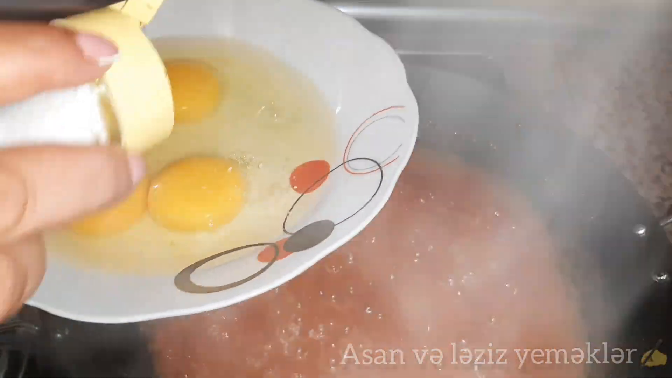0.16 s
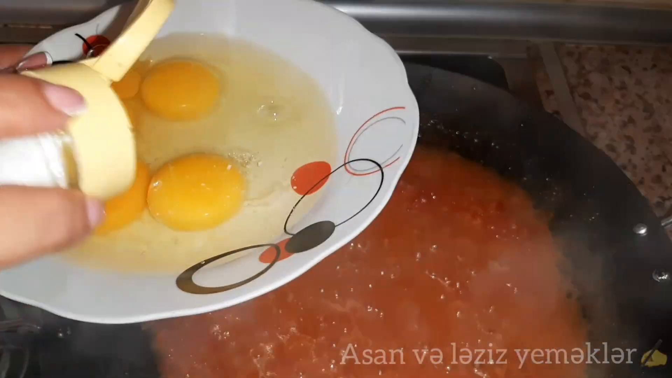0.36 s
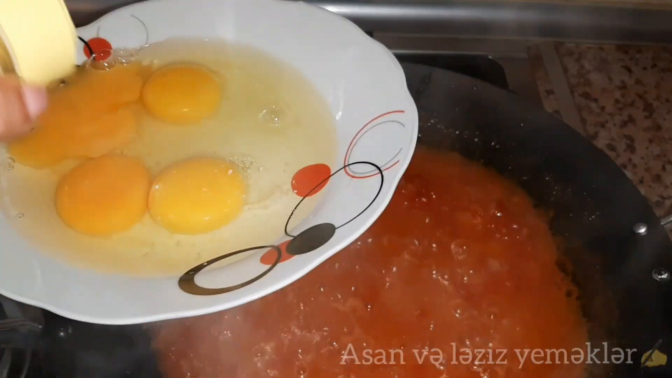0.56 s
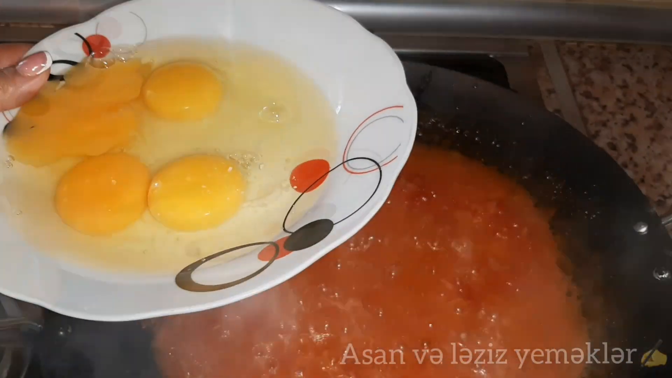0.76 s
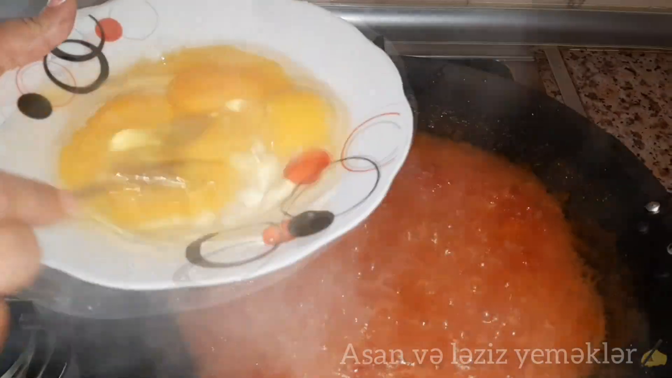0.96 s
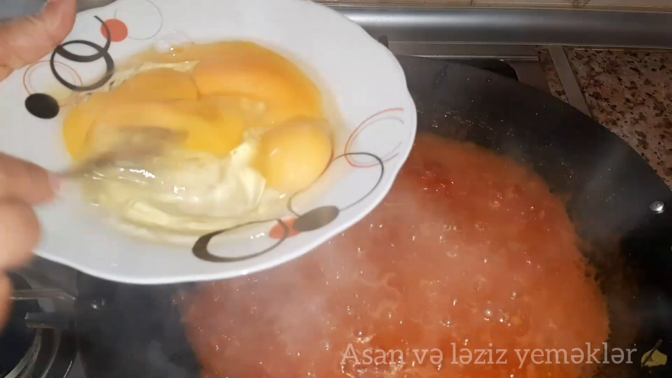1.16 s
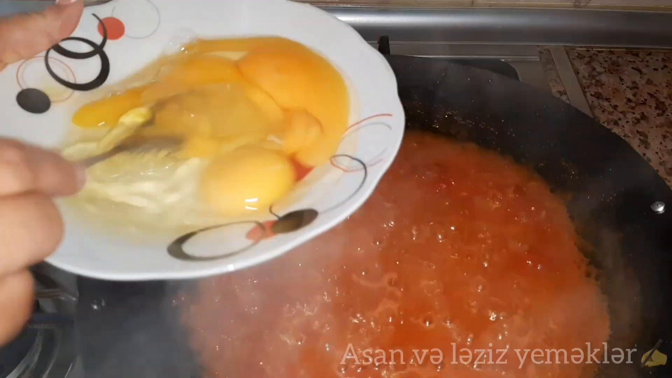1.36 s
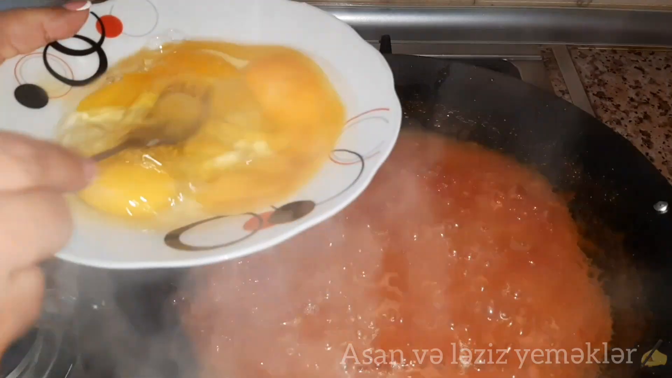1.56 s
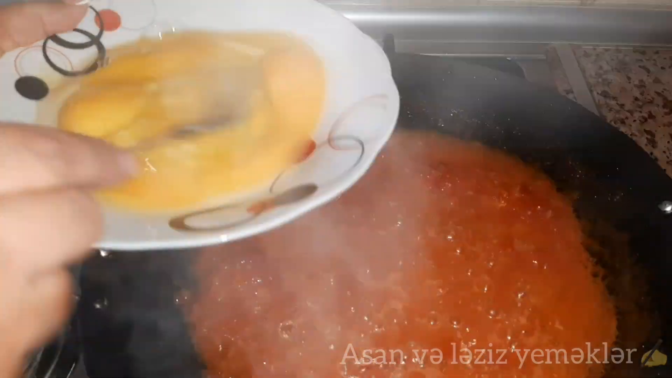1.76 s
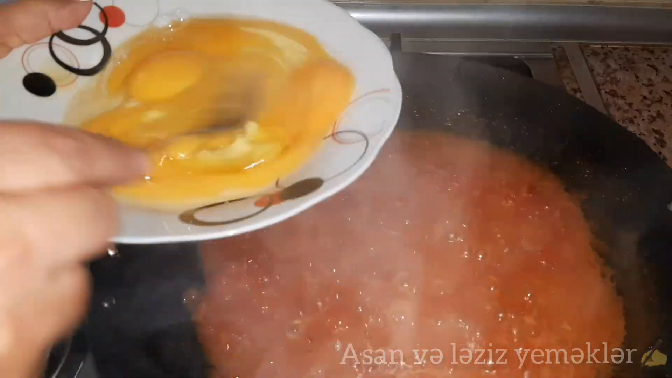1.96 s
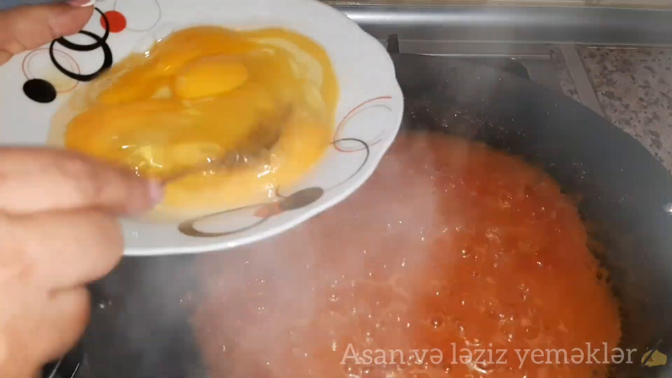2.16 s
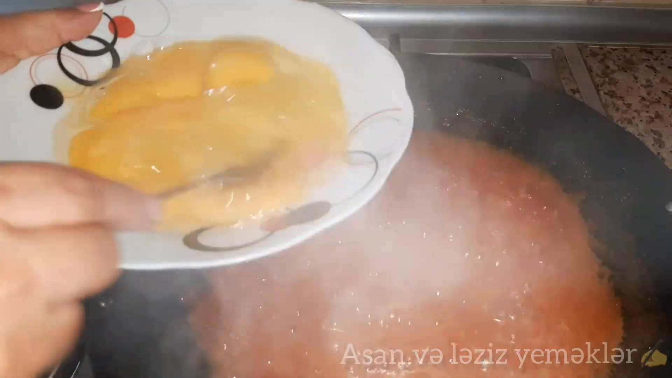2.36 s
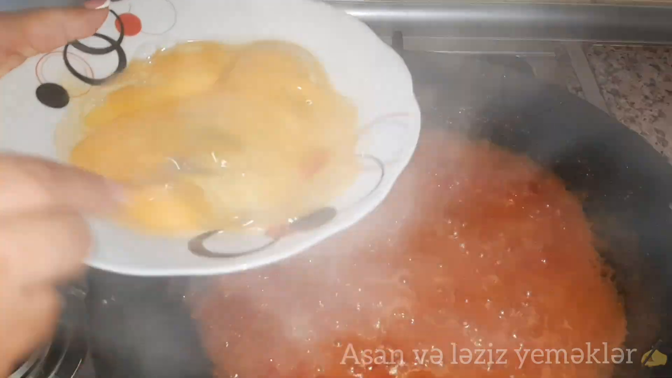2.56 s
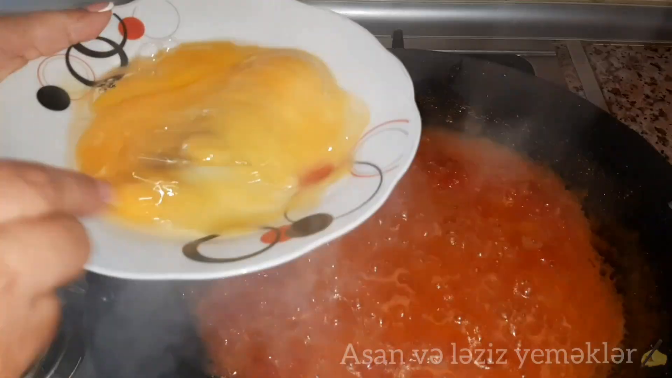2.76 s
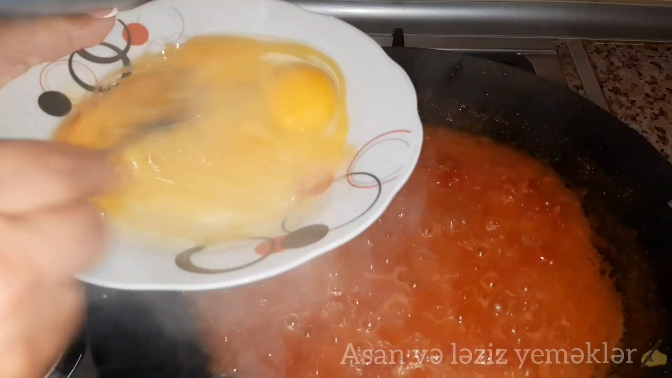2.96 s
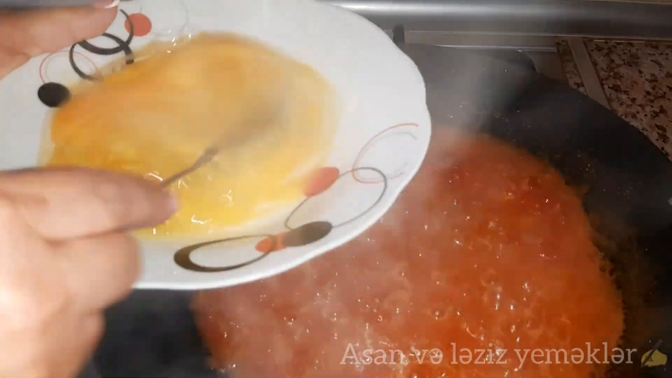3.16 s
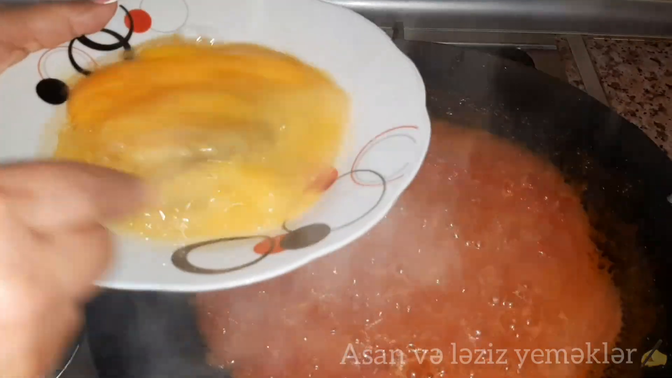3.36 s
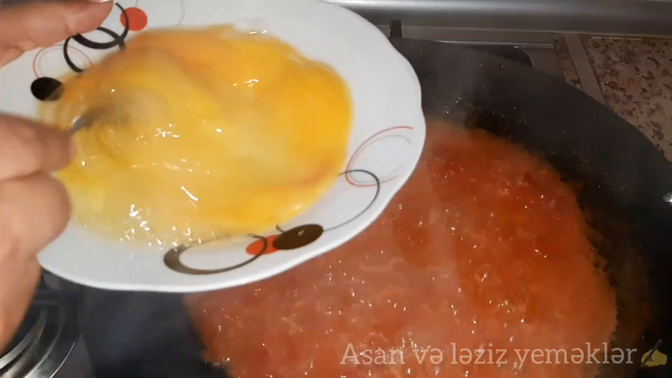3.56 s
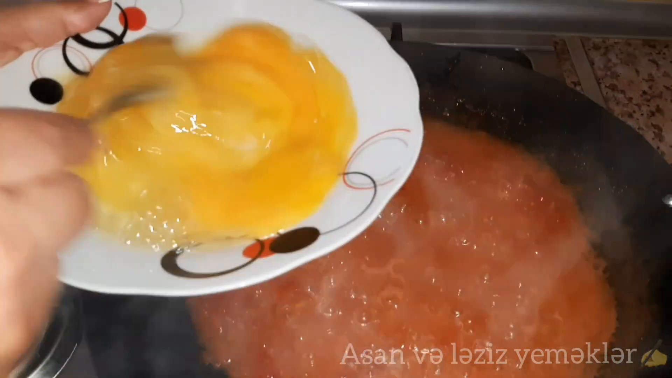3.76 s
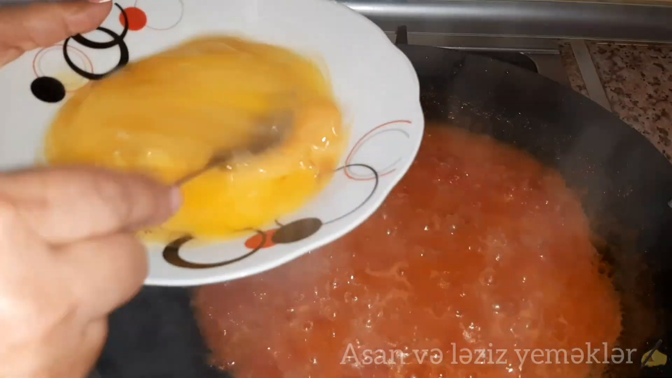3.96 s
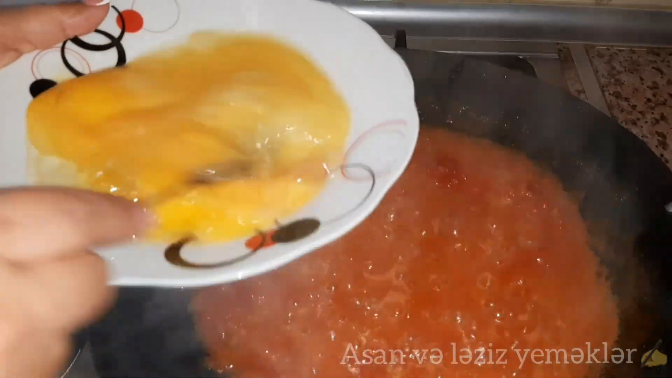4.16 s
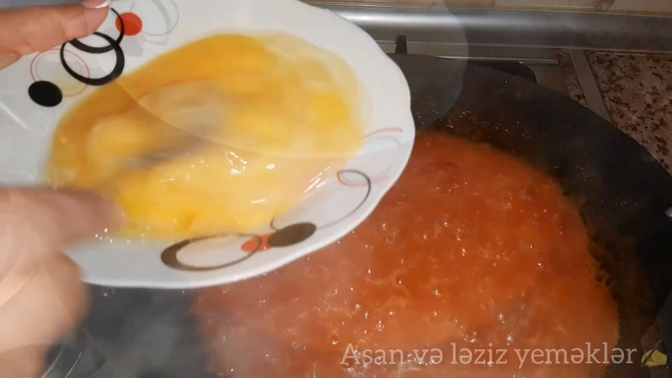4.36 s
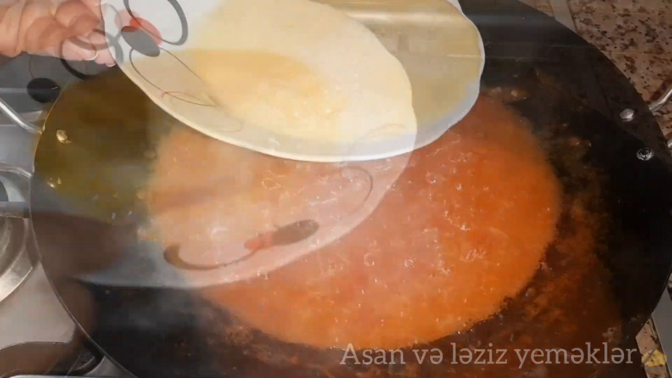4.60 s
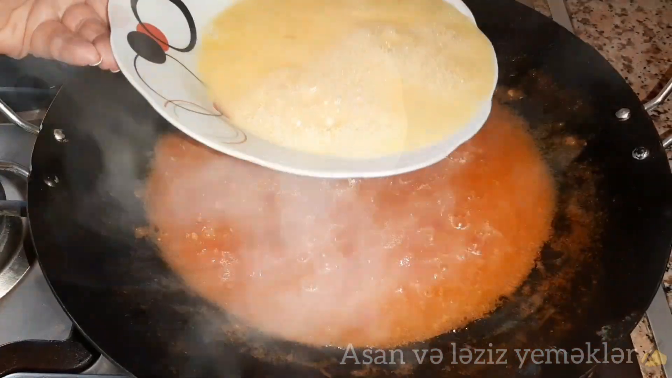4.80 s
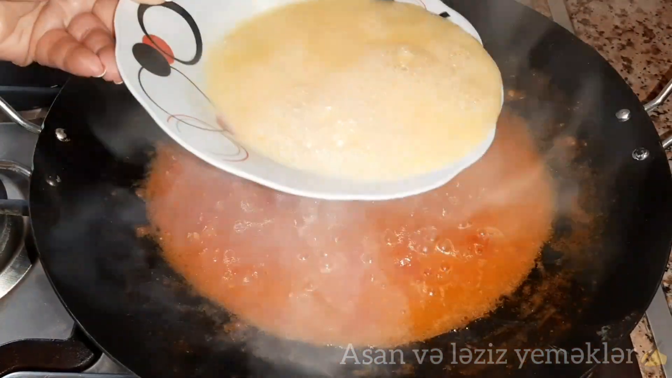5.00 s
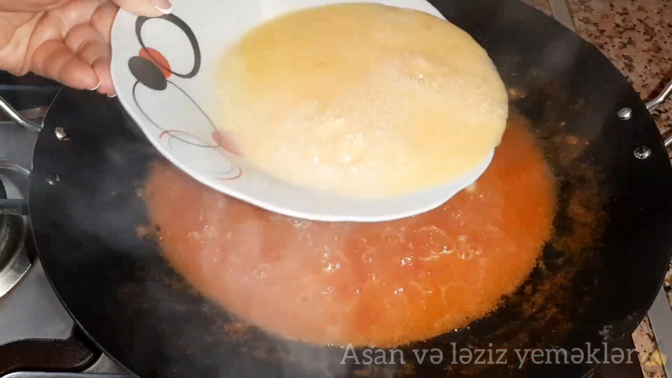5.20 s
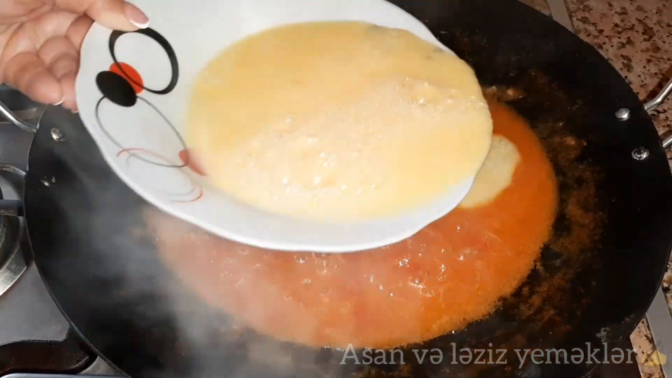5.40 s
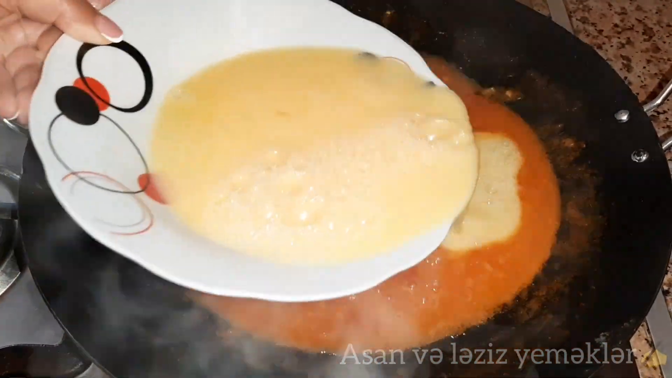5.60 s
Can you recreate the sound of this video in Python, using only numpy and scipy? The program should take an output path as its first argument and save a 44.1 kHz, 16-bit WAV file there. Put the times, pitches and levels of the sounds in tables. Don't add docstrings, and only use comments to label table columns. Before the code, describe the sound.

Close stereo kitchen sound: silence first, then steady, fast egg beating with a metal fork against a china plate, left of centre. Strokes are short, crisp and dry, strongest midway, with small scrapes, ticks and low handling bumps on the left. A quiet bubbling fizz lies underneath. The strokes weaken and vanish before five seconds, leaving nearer, louder simmering sauce and two almost joined crackling fat spits.

```python
import sys
import numpy as np
from scipy import signal
from scipy.io import wavfile
from scipy.ndimage import uniform_filter1d

SR = 44100
rng = np.random.default_rng(int(sys.argv[2]) if len(sys.argv) > 2 else 0)


def log_audio(samples):
    frames = np.atleast_2d(samples).T
    limited = np.clip(frames, -1, 1)
    pcm = np.round(limited * 32767).astype(np.int16)
    wavfile.write(sys.argv[1], SR, pcm)


def voltage_ratio(decibels):
    exponent = np.asarray(decibels, float) / 20
    return 10 ** exponent


N = 248724
LAG = 21

# mode_hz, level_db, t60_s
LOW_MODES = [(919, -1.5, 0.043), (1042, -2.5, 0.036), (1126, -3, 0.068), (1350, -6, 0.023),
             (1377, 3, 0.021)]
MIDDLE_MODES = [(2040, -11.5, 0.074), (2131, 1.5, 0.04), (2200, -1.5, 0.053), (2260, -7, 0.056),
                (2290, -4.5, 0.051)]
BRIGHT_MODES = [(5290, -5.5, 0.015), (5570, -9, 0.068), (5670, 8, 0.0085), (6018, 3, 0.026),
                (6074, -1.5, 0.031), (6390, 5.5, 0.016), (6590, 2, 0.016), (6930, 4.5, 0.027),
                (7230, 5.5, 0.014), (8120, -15, 0.044)]


def evened(x):
    return x / np.sqrt(np.mean(x ** 2) + 1e-20)


def peaked(x):
    return x / np.max(abs(x))


def read(points, hz):
    f, value = np.transpose(points)
    return np.interp(np.log(hz + 1), np.log(f + 1), value)


def add(mix, s, sound):
    part = mix[:, round(s * SR):][:, :sound.shape[1]]
    part += sound[:, :part.shape[1]]


def ports(sound, pan_db):
    left, right = sound * voltage_ratio([[pan_db / 2], [-pan_db / 2]])
    return np.array([left, np.r_[np.zeros(LAG), right[:-LAG]]])


def kitchen(x):
    # band_hz, t60_s
    room_decay = [(300, 0.43), (1000, 0.26), (2500, 0.39), (6000, 0.26), (12000, 0.26)]
    taps = np.zeros((2, SR // 2))
    at = np.arange(200, SR // 2 - 20, 20)
    at = at + rng.integers(0, 20, (2, len(at)))
    np.put_along_axis(taps, at, rng.choice([-1., 1.], at.shape), 1)
    hz, t, z = signal.stft(taps, SR, nperseg=256)
    decay = voltage_ratio(-60 * t / read(room_decay, hz)[:, None])
    tail = signal.istft(z * decay, SR, nperseg=256)[1]
    return signal.fftconvolve(x, tail / np.linalg.norm(tail[0]), axes=1)[:, :N]


def sauce():
    # time_s, level_db, close_share (0-1)
    simmer = [(.6, -59, 0.72), (1.4, -60.5, 0.94), (2.2, -63, 1), (3.0, -60, 0.4), (3.7, -64.5, 0.86),
              (4.2, -62, 0.8), (4.6, -56.5, 1), (5.0, -52.5, 1.2), (5.3, -50, 1.1), (5.64, -52.5, 1.2)]
    # band_hz, density_db (per Hz)
    far_colour = [(15, -60), (25, -30), (90, -7), (280, -10), (531, 5), (659, -14), (1130, 4.5), (1740, 1),
                  (2160, 13.5), (3250, -48), (6050, 10), (8360, -13), (11600, -13), (16000, -5)]
    close_colour = [(15, -54), (25, -43), (87, 1), (270, -16.5), (531, -3.5), (641, -9.5), (1040, -6.5),
                    (1840, -10.5), (2160, -8), (4870, -7.5), (6560, -10), (7710, -11), (12500, -15.5),
                    (16000, -23)]
    # band_hz, likeness (-1 to 1)
    likeness = [(60, 0.93), (180, 0.87), (550, 0.83), (1650, 0.2), (4970, 0.012), (15000, 0.025)]
    # band_hz, left_right_db
    balance = [(60, -1.5), (180, 4), (550, -0.5), (1650, -1.5), (4970, 0.5), (15000, 4)]

    frames, hz = N // 256 + 5, np.fft.rfftfreq(1024, 1 / SR)
    t = np.arange(frames) * 256 / SR
    s, db, share = np.transpose(simmer)
    close = np.clip(np.interp(t, s, share), 0, 1)

    hiss = rng.standard_normal((2, N + 2048))
    sizes = voltage_ratio(5.5 * np.minimum(rng.exponential(1, hiss.shape), 5))
    sizes = sizes * (rng.random(hiss.shape) < 1500 / SR)
    burst = rng.standard_normal((2, 300)) * np.exp(-np.arange(300) / (0.003 * SR))
    impulses = sizes * rng.choice([-1., 1.], sizes.shape)
    pops = evened(signal.oaconvolve(impulses, burst, "same", axes=1))

    z = signal.stft(hiss, nperseg=1024, noverlap=768)[2][:, :, :frames]
    z_pops = signal.stft(pops, nperseg=1024, noverlap=768)[2][:, :, :frames]
    z = z + .5 * np.outer(np.clip(hz / 4000, 0, 1.8), close ** 2) * z_pops
    same = np.clip(read(likeness, hz), -1, 1)[:, None]
    z = np.array([z[0], same * z[0] + np.sqrt(1 - same ** 2) * z[1]])

    patches = rng.standard_normal((frames, 513)).T
    patches = uniform_filter1d(patches, size=14, axis=0)
    patches = evened(uniform_filter1d(patches, size=10, axis=1))
    shapes = [voltage_ratio(read(c, hz)) for c in (far_colour, close_colour)]
    far, near = (c[:, None] / np.linalg.norm(c[5:]) for c in shapes)
    colour = np.sqrt((1 - close) * far ** 2 + close * near ** 2)
    colour = colour * voltage_ratio(1.72 * patches + np.interp(t, s, db))
    z = z * colour * voltage_ratio(np.outer([.5, -.5], read(balance, hz)))[:, :, None]
    return voltage_ratio(27.5) * signal.istft(z, nperseg=1024, noverlap=768)[1][:, :N]


def click(db, hz, width_hz, size=1200):
    t = np.arange(size) / SR
    swell = (1 - np.exp(-t * hz / 0.99)) ** 2 * np.exp(-np.pi * width_hz * t)
    return voltage_ratio(db) * peaked(swell * np.sin(2 * np.pi * hz * t))


def spit(s, db, hz, low_db, high_db):
    burst = click(db, hz, 350) + click(db + low_db, 2160, 2000) + click(db + high_db, 10200, 2200)
    return s, burst * voltage_ratio([[-2.2], [2.2]])


def slop(s, db, hz, width_hz):
    return s, click(db, hz, width_hz, size=3000) * np.ones((2, 1))


def clatter(low_hz, high_hz, db, decay_s):
    t = np.arange(6000) / SR
    both, left, right, grain = rng.standard_normal((4, 6000))
    lumps = np.exp(.5 * evened(uniform_filter1d(grain, size=60)))
    decay = np.exp(-t / abs(decay_s)) + 0.15 * np.exp(-t / 0.013)
    shape = decay * lumps * (1 - np.exp(-t / 0.0001))
    band = signal.butter(2, [low_hz, high_hz], "bandpass", fs=SR, output="sos")
    return voltage_ratio(db) * peaked(signal.sosfilt(band, np.array([both + left, both + right]) * shape))


def jolt(s, db):
    u = np.arange(2000) / SR
    push = -np.exp(-((u - .002) / 0.00077) ** 2)
    push += 0.25 * np.exp(-((u - .007) / 0.0025) ** 2)
    push -= 0.07 * np.exp(-((u - .015) / 0.00077) ** 2)
    return s, voltage_ratio(db + 10) * push * np.array([[1], [-.05]])


def thud(s, db):
    # low_edge_hz, high_edge_hz, level_db (re the jolt), decay_s
    hand_noise = (152, 750, -7, 0.003)
    return s, voltage_ratio(db) * clatter(*hand_noise)


def ring(modes, spread_db, favour_hz=0., reach_hz=198.0):
    # mode_hz, left_right_db
    mode_lean = [(900, -3), (2200, -7.5), (4000, -6.5), (6000, -1), (9000, 19), (13000, -4.5)]
    # mode_hz, phase_rad
    phase_lead = [(860, 1.7), (1210, 0.57), (1890, 4.06), (3620, 8.84), (5940, 18.5), (14000, 44.74)]
    hz, db, t60 = np.transpose(modes)[:, :, None]
    t, luck = np.arange(6000) / SR, rng.standard_normal((len(modes), 8))
    db = db + spread_db * luck[:, :1] + 9.4 * np.exp(-((hz - favour_hz) / reach_hz) ** 2)
    hz = hz * (1 + 0.0088 * luck[:, 1:2])
    beat_hz = 55 + 25 * luck[:, 5:6]
    beat = 1 + 0.81 * np.sin(2 * np.pi * beat_hz * t + 3 * luck[:, 6:7])
    onset = 1 - np.exp(-t * hz / 2.2)
    size = voltage_ratio(db - 60 * t / t60) * beat * onset * np.sign(luck[:, 7:])
    lean_db = read(mode_lean, hz) / 2
    shift = 2 * np.pi * hz * LAG / SR - read(phase_lead, hz) + 0.62 * luck[:, 2:3]
    left = voltage_ratio(lean_db + 2.07 * luck[:, 3:4]) * np.sin(2 * np.pi * hz * t)
    right = voltage_ratio(-lean_db + 2.44 * luck[:, 4:5]) * np.sin(2 * np.pi * hz * t + shift)
    return np.array([(size * left).sum(0), (size * right).sum(0)])


def touch(s, db, hz, width_hz, ring_db):
    bright, middle, low = [peaked(ring(modes, 7.7)) for modes in (BRIGHT_MODES, MIDDLE_MODES, LOW_MODES)]
    out = voltage_ratio(db + ring_db) * (bright * min(hz / 6000, 1) ** 3 + 1.5 * middle + 0.9 * low)
    out[:, :1200] += click(db, hz, width_hz)
    return s, ports(out, 6.5)


def contact_at(s):
    # time_s, chatter_ms, left_right_db, low_mode_hz, middle_mode_hz
    wander = [(.8, 12, 3.5, 1110, 2080), (1.36, 8.2, 4, 1046, 2146), (1.55, 10.4, 4, 1180, 2200),
              (2.4, 6.2, 3.5, 1186, 2200), (2.9, 7.3, 3.5, 960, 2164), (3.5, 6.4, 4, 960, 2120),
              (3.7, 4.5, 5, 1215, 2220), (4.0, 9.4, 6, 926, 2240), (4.9, 6.3, 3.5, 1130, 2380)]
    # time_s, upper_db, top_db (both re the blow)
    bite = [(.8, -20.5, -18), (1.2, -19.5, -13), (1.8, -12, -14.5), (2.55, -16.5, -9.5), (2.8, -18, -15),
            (3.1, -23, -13.5), (3.55, -14.5, -11), (3.9, -21.5, -11), (4.3, -15, -15.5),
            (4.9, -12.5, -11.5)]
    curves = [np.transpose(wander), np.transpose(bite)]
    return [np.interp(s, curve[0], column) for curve in curves for column in curve[1:]]


def stroke(blow, contact):
    # mode_hz, level_db, t60_s
    upper_modes = [(2944, -9.5, 0.041), (3510, -7.5, 0.031), (3718, 7.5, 0.032), (3980, -7.5, 0.034),
                   (4413, 3.5, 0.011), (4720, -24, 0.0087)]
    top_modes = [(8500, -13, 0.01), (9273, 1.5, 0.034), (10010, -1.5, 0.057), (10490, 4, 0.036),
                 (11350, 4.5, 0.046), (11700, -4, 0.03), (12560, -8.5, 0.038), (12430, -4, 0.022),
                 (15200, -13, .012)]
    # low_edge_hz, high_edge_hz, level_db (re the ring), decay_s
    clatter_bands = [(4980, 6330, -5.5, 0.0031), (586, 2000, -6, 0.013), (1530, 3960, -16.5, 0.027),
                     (3000, 4650, -8.5, 0.02), (8100, 12800, 0.5, 0.0054)]
    s, db, low_db, middle_db, hz = blow
    chatter_ms, pan_db, low_hz, middle_hz, upper_db, top_db = contact
    t = np.arange(4000) / SR
    landing = np.exp(-t * 2000 / max(chatter_ms, .5)) + 0.011 * np.exp(-t / 0.0088)
    tines = rng.standard_normal(4000) * (rng.random(4000) < .08) * landing
    tines[0] = 1.61
    first = tines * (np.exp(-t / 0.0033) + 0.13)
    groups = [ring(BRIGHT_MODES, 2.45, hz), ring(LOW_MODES, 2.2, low_hz, 70.0),
              ring(MIDDLE_MODES, 2.05, middle_hz, 62.0), ring(upper_modes, 2.5), ring(top_modes, 2.)]
    levels_db = (0, low_db + 9.5, middle_db + 9.5, upper_db + 5.0, top_db)
    drives = (tines, first, tines, tines, tines)
    out = np.zeros((2, 9999))
    for modes, band, rel_db, drive in zip(groups, clatter_bands, levels_db, drives):
        out += voltage_ratio(rel_db) * peaked(signal.fftconvolve(modes, drive[None], axes=1))
        out[:, :6000] += voltage_ratio(rel_db) * clatter(*band)
    return s, voltage_ratio(db) * ports(out, pan_db)


def scene():
    # start_s, blow_db, low_ring_db, middle_ring_db, brightest_hz
    early_stroke = (.617, -36, -38, -24, 6600)
    # chatter_ms, left_right_db, low_mode_hz, middle_mode_hz, upper_db, top_db
    early_drag = (60.0, 1.5, 1134, 2200, -11, -2)
    # start_s, blow_db, low_ring_db, middle_ring_db, brightest_hz (rings re the blow)
    strokes = [(0.81, -21, -23.5, -22.5, 6490), (0.9927, -19, -31.5, -21.5, 6350),
               (1.1845, -19, -31, -21.5, 6100), (1.3573, -18, -21.5, -18.5, 5860),
               (1.5359, -19.5, -19.5, -13, 5810), (1.6957, -16, -32.5, -17, 5990),
               (1.8801, -21, -22, -17, 5720), (2.0651, -14.5, -42.5, -24, 6390),
               (2.228, -15, -34.5, -20, 5970), (2.4081, -16.5, -33, -19.5, 6300),
               (2.5787, -15.5, -32, -21, 5960), (2.7501, -12, -33.5, -22, 6110),
               (2.897, -14.5, -31.5, -23.5, 7200), (3.0601, -13.5, -33.5, -24, 6100),
               (3.2312, -17.5, -31.5, -20, 7200), (3.3925, -17.5, -27, -29, 6190),
               (3.5548, -19.5, -24.5, -19, 5630), (3.6935, -21.5, -14.5, -18, 5570),
               (3.8693, -20, -27.5, -18, 7200), (4.009, -23, -26, -16, 5960),
               (4.1807, -19.5, -33, -22, 6230), (4.3414, -19, -35, -22, 5500),
               (4.4829, -21.5, -28.5, -20.5, 6670)]
    # start_s, blow_db, brightest_hz
    fading = [
        (4.642, -29, 6180),
        (4.8073, -33, 7200),
        (4.9376, -34.5, 7300),
    ]
    # low_ring_db, middle_ring_db
    fading_rings = (-25.5, -16.5)
    # start_s, level_db, centre_hz, width_hz, ring_db
    touches = [(0.7747, -37.5, 8700, 3000, -23), (1.1755, -35.5, 5850, 4000, -6.5),
               (1.3247, -24.5, 7300, 5030, -36), (1.861, -34.5, 5750, 5000, -32),
               (2.185, -39, 9100, 5000, -28), (2.3852, -33, 8040, 5000, -17),
               (2.7375, -27, 7150, 5000, -29), (3.527, -33.5, 8000, 3000, -24),
               (3.851, -26, 6840, 6040, -9.5), (3.9811, -43, 2200, 2000, 0.5),
               (4.1311, -28.5, 9200, 6100, -24), (4.1562, -66, 8000, 6000, -49),
               (4.3203, -27, 6050, 4930, -29), (4.475, -46, 6940, 5000, -1), (4.6047, -32, 4300, 1980, -35)]
    # start_s, level_db
    jolts = [(2.065, -55), (2.579, -62), (2.75, -44), (2.898, -47), (3.059, -33.5), (3.231, -52),
             (3.392, -44.5), (3.554, -55), (3.87, -49.5), (4.18, -62), (4.342, -39.5)]
    # start_s, level_db, pitch_hz, width_hz
    slops = [
        (3.245, -53.5, 513, 36),
        (4.055, -54, 720, 49.6),
        (4.075, -50.5, 920, 53),
        (4.385, -52, 732, 60),
        (4.39, -51.5, 910, 65.8),
        (3.41, -43.5, 1995, 59.7),
        (3.745, -33, 6040, 1500),
    ]
    # start_s, level_db, pitch_hz, low_snap_db, high_snap_db
    spits = [
        (5.2448, -15.5, 4420, -13.5, -9.5),
        (5.2573, -17.5, 4330, -4, -31),
    ]

    hits, near, bumps = np.zeros((3, 2, N))
    add(hits, *stroke(early_stroke, early_drag))
    for blow in strokes + [(s, db, *fading_rings, hz) for s, db, hz in fading]:
        add(hits, *stroke(blow, contact_at(blow[0])))
    for row in touches:
        add(hits, *touch(*row))
    for row in spits:
        add(near, *spit(*row))
    for row in slops:
        add(near, *slop(*row))
    for row in jolts:
        add(bumps, *jolt(*row))
        add(bumps, *thud(*row))
    no_bass = signal.butter(4, 750, "highpass", fs=SR, output="sos")
    hits = signal.sosfilt(no_bass, hits)
    room = voltage_ratio(-7.5) * kitchen(hits + voltage_ratio(-15) * near)
    return hits + near + room + bumps + sauce()


def low_pass(x):
    return signal.sosfilt(signal.butter(12, 16800, fs=SR, output="sos"), x)


def record(dry):
    # start_s, full_s
    fade_in = (.614, .628)
    start, full = fade_in
    fade = np.clip((np.arange(N) / SR - start) / (full - start), 0, 1)
    dry = signal.sosfilt(signal.butter(2, 60, "highpass", fs=SR, output="sos"), dry)
    band_limit = signal.firwin(511, 15800, window=("kaiser", 5), fs=SR)
    limited = signal.oaconvolve(dry, band_limit[None], "same")
    return low_pass(limited * fade)


dry = scene()
out = record(dry)
log_audio(out)
```